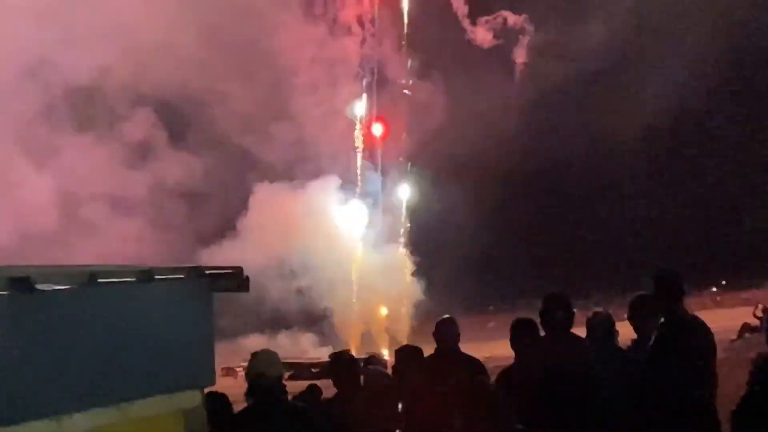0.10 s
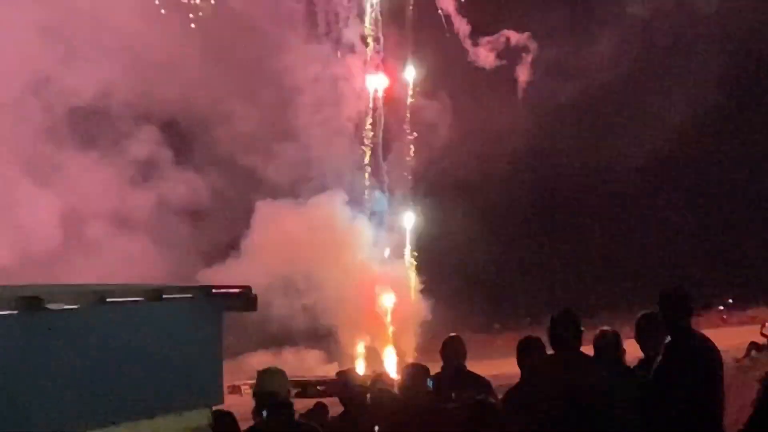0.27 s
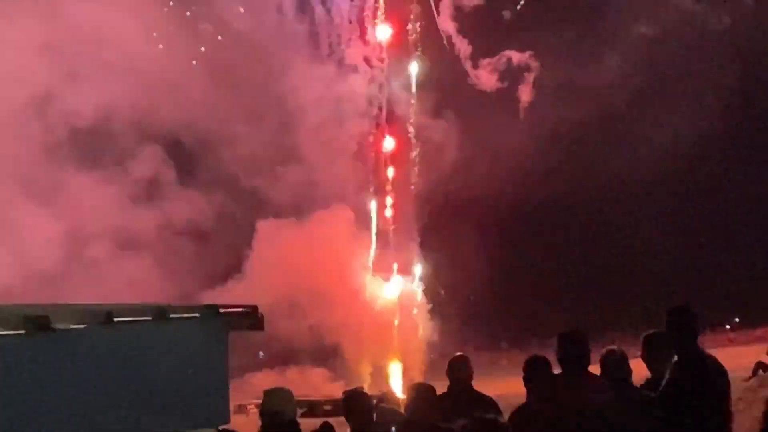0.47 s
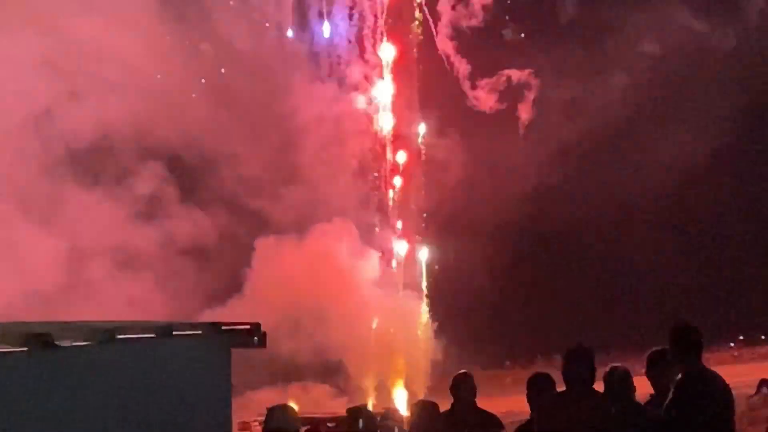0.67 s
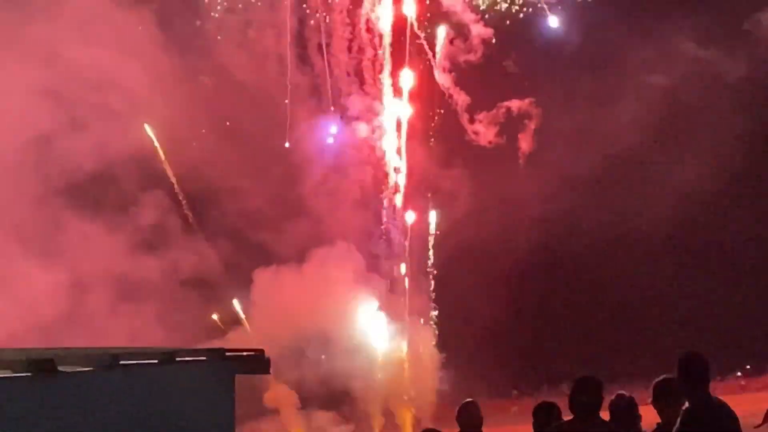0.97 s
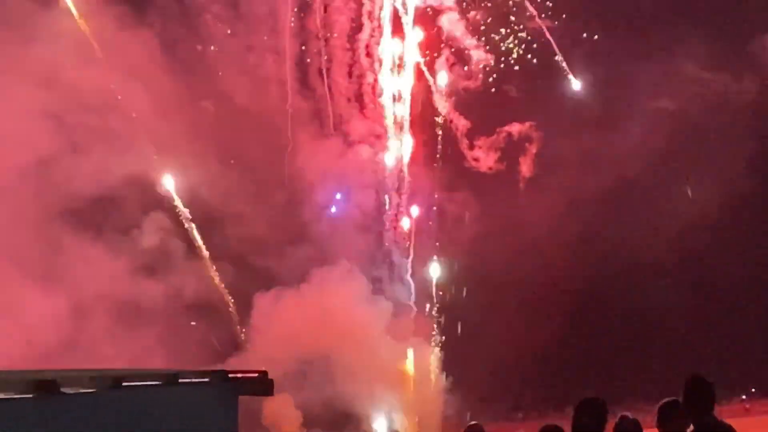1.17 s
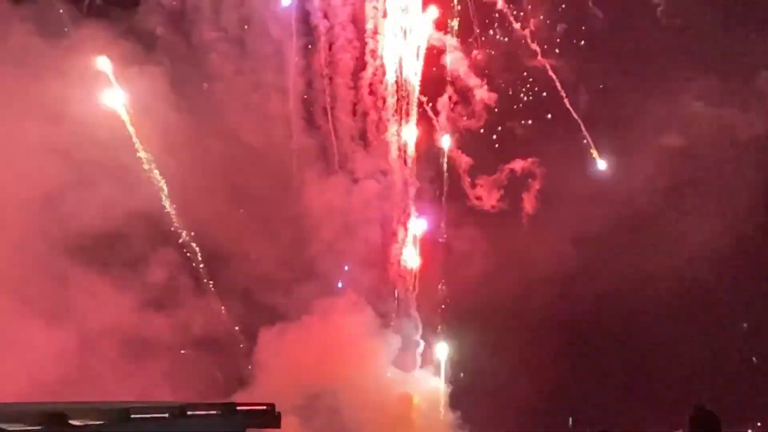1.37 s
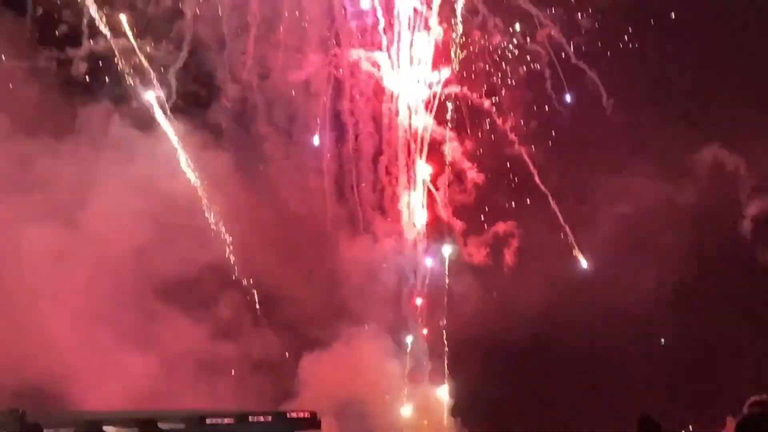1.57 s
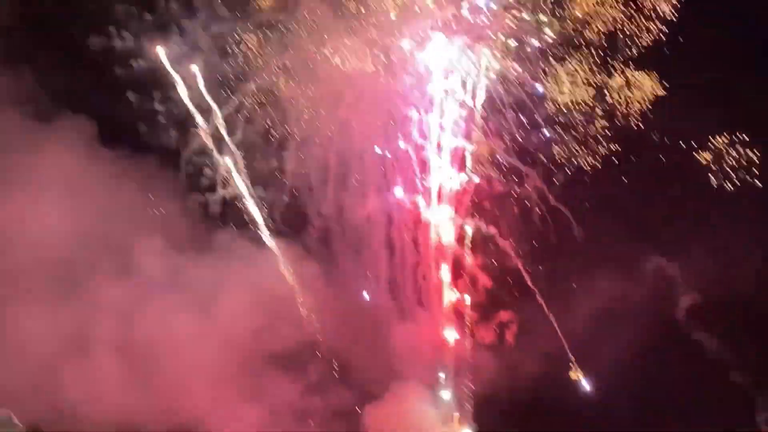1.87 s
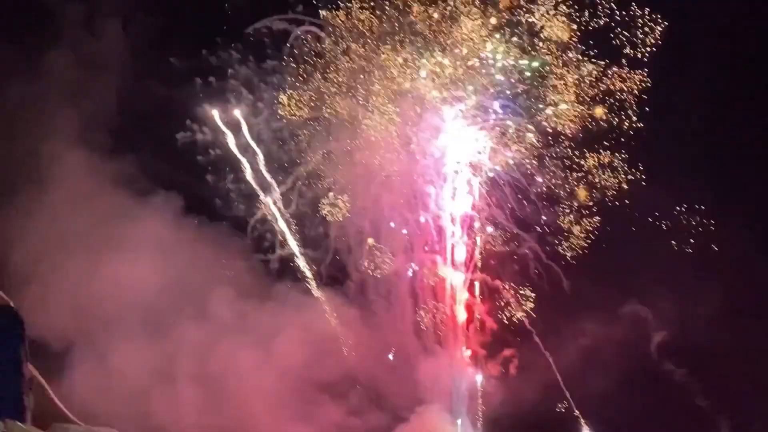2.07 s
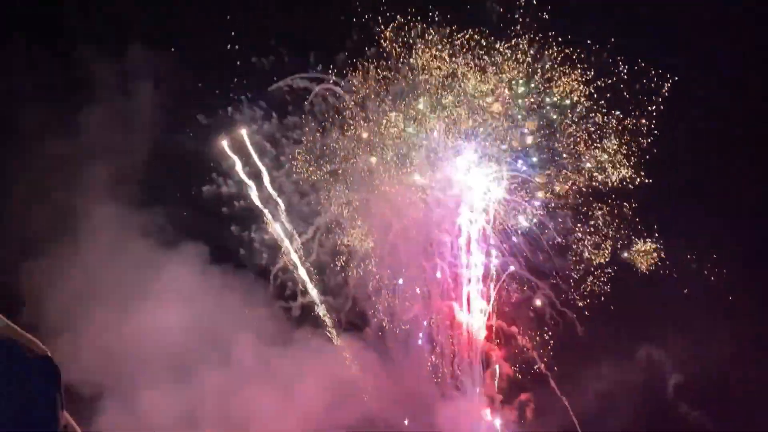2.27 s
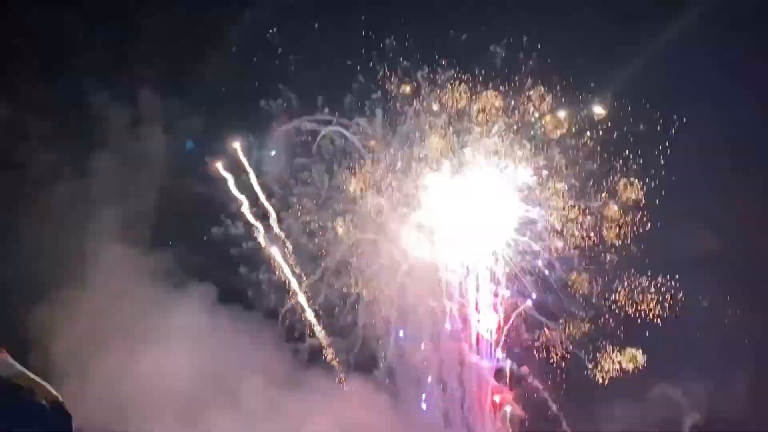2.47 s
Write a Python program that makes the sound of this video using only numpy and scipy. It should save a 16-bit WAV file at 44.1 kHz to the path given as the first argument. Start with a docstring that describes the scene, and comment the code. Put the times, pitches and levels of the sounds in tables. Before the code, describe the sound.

Fireworks barrage outdoors. Crackling, sizzling stars and a low roll run from the start, with a dull thud near 0.1 s. From 0.23 s about nineteen loud, punchy bangs come unevenly, clustered around 0.7-0.85, 1.2, 1.7 and 1.9-2.2 s, the last at 2.33 s, with short field echoes. Deep distant booms swell near 1.0-1.3 s. Pops crackle on alone until about 2.6 s.

```python
"""A fireworks barrage at night in the open, heard by a phone some way from the mortars.
From the start, stars crackle densely overhead (short pops and hiss) above a low roll (filtered noise).
A little later the lift charges bang in quick, uneven order: pressure steps with ground mirrors and echoes.
Big shells boom high up, mostly midway, as low pulses; dull thuds come from afar. The crackle outlasts the bangs.
The phone's filters let the lows arrive late, so every bang becomes a short falling chirp."""
import sys
import numpy as np
from scipy import signal
from scipy.fft import rfft, irfft, next_fast_len
from scipy.io import wavfile

SR = 44100
rng = np.random.default_rng(int(sys.argv[2]) if len(sys.argv) > 2 else 0)


def to_wav(sig):
    """Store sig (one row per channel, or 1-D mono) as 16-bit WAV at the path in sys.argv[1].

    Samples outside -1..1 are clipped; the rate is SR.
    """
    pcm = np.clip(np.atleast_2d(sig), -1, 1) * 32767
    pcm = np.round(pcm).astype(np.int16)
    wavfile.write(sys.argv[1], SR, pcm.T)  # frames by channels


N = 114660
M = next_fast_len(N + SR)  # working length in samples, with a spare second for echoes
HZ = np.arange(M // 2 + 1) * SR / M
S = 2j * np.pi * HZ  # multiplying by exp(-S * lag) delays a sound by lag seconds
APART_DB = -8  # level of the left-right difference in stereo noise


def undb(db):
    """Turn decibels into a gain."""
    return 10 ** (np.asarray(db, float) / 20)


def low(hz):
    """One-pole low-pass response: lets the lows through."""
    return 1 / (1 + 1j * HZ / hz)


def second(hz, q):
    """High-pass, band-pass and all-pass responses of one resonator."""
    u = 1j * HZ / hz
    d = u * u + u / q + 1
    high_pass = u * u / d
    band_pass = u / q / d
    all_pass = (u * u - u / q + 1) / d
    return high_pass, band_pass, all_pass


def band(lo_hz, hi_hz):
    """Band-pass response that keeps white noise of rms 1 at rms 1."""
    shape = second(lo_hz, 1.0)[0] * low(hi_hz) ** 2
    return shape / np.sqrt(np.mean(np.abs(shape) ** 2))


def peak(shape):
    """Scale a response so that its impulse peaks at 1."""
    return shape / np.abs(irfft(shape, M)).max()


def train(times, gains):
    """Spectrum of clicks, each shared between two neighbouring samples."""
    x = np.zeros(M)
    at = np.clip(np.asarray(times) * SR, 0, M - 2)
    i = at.astype(int)
    np.add.at(x, i, gains * (1 + i - at))
    np.add.at(x, i + 1, gains * (at - i))
    return rfft(x)


def stereo(size):
    """Noise that is mostly alike left and right."""
    mid, side = rng.standard_normal((2, size))
    return mid + undb(APART_DB) * side * np.array([[1], [-1]])


def bursts(times, db, t60, lo_hz, hi_hz):
    """Band-passed noise that dies away after each time; where bursts overlap, their powers add."""
    t = np.arange(SR // 2) / SR
    power_fall = np.exp(-2 * np.log(1000) * t / t60)
    power = irfft(train(times, undb(2 * db)) * rfft(power_fall, M), M)
    return rfft(stereo(M) * np.sqrt(np.maximum(power, 0))) * band(lo_hz, hi_hz)


BLAST_FALL_S, BLAST_EDGE_HZ, BANG_LOW_HZ = 0.0059, 18000, 205.2  # pressure fall, sharp front, bass loss
BODY_HZ, BODY_DB, FRONT_DB = 556, 2.5, -6.5  # corner of the blast's body, gains well below and well above it
GROUND_HZ = 504  # soft ground dulls the mirrors
SECOND_LAG_S, SECOND_DB = 0.006114, -11  # second, later mirror
THUMP_DB, THUMP_HZ, THUMP_LAG_S = -30, 60, 0.00067  # deep push of each mortar
# Lift charges, levels before the blast is shaped.
# Columns: t/s, level/dB, lag of the ground mirror [ms], level of the mirror against the bang/dB
LIFT_CHARGES = [(0.2284, 7.6, 3.4, -3), (0.4101, 7.5, 3.51, -3), (0.6, 8.5, 3.68, -1.3),
                (0.717, 7.3, 3.45, -0.5), (0.735, 7.5, 3.5, -5.5), (0.7858, 7.5, 3.06, -5.5),
                (0.849, 8, 3.2, -3), (1.0765, 7.5, 3.68, 2.1), (1.2, 7.5, 3.4, -5), (1.2603, 8.0, 3.4, -4),
                (1.5914, 7.5, 3.24, -4), (1.6813, 7.5, 3.3, -2), (1.7239, 7, 3.87, -1.2),
                (1.9006, 8.5, 3.86, -6), (1.9095, 7.5, 3.5, -8), (2.065, 7, 3.6, -4), (2.1725, 7, 3.2, -9),
                (2.1877, 7, 3.4, -6), (2.3286, 7.5, 3.3, -5)]


def bangs():
    """Each lift charge is a pressure step that falls away, with ground mirrors, a thump and echoes."""
    t, db, lag_ms, ground_db = np.array(LIFT_CHARGES).T
    direct = sum(undb(d) * np.exp(-S * a) for a, d in zip(t, db))

    first_mirror = train(t + lag_ms / 1000, undb(db + ground_db))
    second_mirror = undb(SECOND_DB) * direct * np.exp(-S * SECOND_LAG_S)
    mirrors = (first_mirror + second_mirror) * low(GROUND_HZ) ** 2

    blast = SR / (S + 1 / BLAST_FALL_S) * low(BLAST_EDGE_HZ)
    blast = blast * second(BANG_LOW_HZ, np.sqrt(.5))[0] ** 2
    body_gain = undb(FRONT_DB) + (undb(BODY_DB) - undb(FRONT_DB)) * low(BODY_HZ)
    near = (direct + mirrors) * blast * body_gain

    thump_shape = peak(second(THUMP_HZ, 1.36)[1] * low(THUMP_HZ) ** 2)
    thump = undb(THUMP_DB) * direct * np.exp(-S * THUMP_LAG_S) * thump_shape
    return near * (1 + field_roll()) + thump + (rasp(t, db) + scatter(t, db) + wall_echo(t, db))


def rasp(t, db):
    """Rough edge of each bang: a very short burst of bright noise."""
    return bursts(t, db - 25.5, 0.011, 980, 8100)


def scatter(t, db):
    """Near things scatter each bang into a short wash of noise, 3.5 ms late."""
    return bursts(t + 0.0035, db - 28, 0.07, 240, 1260)


def wall_echo(t, db):
    """A far wall sends each bang back 92 ms late, as a blurred, dull echo."""
    wall_hz = 430
    return bursts(t + .092, db - 28, 0.1, 152, wall_hz) * low(wall_hz) ** 2


FIELD_DB, FIELD_T60_S, FIELD_LAG_S, FIELD_HZ = -16.5, 0.65, .02, 447


def field_roll():
    """Long roll over the field: the response of a dulled, dying noise echo."""
    t = np.arange(SR) / SR
    fall = np.exp(-np.log(1000) * t / FIELD_T60_S)
    noise = stereo(SR) * fall / np.sqrt(np.sum(fall ** 2))
    return undb(FIELD_DB) * rfft(noise, M) * np.exp(-S * FIELD_LAG_S) * low(FIELD_HZ) ** 2


# Distant shell bursts. Columns: t/s, level/dB
SHELL_BOOMS = [(0.002, -24), (0.975, -7.5), (1.11, -16.5), (1.288, -10), (1.39, -23.5), (2.455, -28)]


def booms():
    """Big shells so far off that only a rounded, deep pulse is left."""
    return far_pulses(SHELL_BOOMS, 62.7, 1.6)


# Dull far thuds. Columns: t/s, level/dB
FAR_THUDS = [(0.072, -19), (0.134, -27), (0.458, -30), (0.567, -29), (1.643, -28), (2.417, -29),
             (2.546, -44)]


def thuds():
    """Far thuds: the same kind of rounded pulse as a boom, but higher in pitch."""
    return far_pulses(FAR_THUDS, 290, 1.15)


def far_pulses(table, hz, q):
    """Clicks rung through a broad resonance and dulled, as distance dulls a burst."""
    t, db = np.array(table).T
    return train(t, undb(db)) * peak(second(hz, q)[1] * low(1.7 * hz) ** 3)


CRACK_LOW_HZ, CRACK_HIGH_HZ, CRACK_TOP_HZ = 525, 3240, 7700  # lower corner, two upper corners
CRACK_TAIL_DB, CRACK_T60_S = -15.5, 0.011  # blur after each pop


def crackle():
    """Stars crackle as tiny sharp clicks, bass and top taken off, each with a short blur of noise."""
    t, db, pan_db = np.concatenate([single_stars(), star_cloud()], axis=1)
    clicks = np.array([train(t, undb(db + pan_db / 2)), train(t, undb(db - pan_db / 2))])
    shape = peak(second(CRACK_LOW_HZ, 0.74)[0] * low(CRACK_HIGH_HZ) * low(CRACK_TOP_HZ) ** 2)
    blur = bursts(t, db + CRACK_TAIL_DB, CRACK_T60_S, CRACK_LOW_HZ, 2 * CRACK_HIGH_HZ)
    return clicks * shape + blur * low(CRACK_TOP_HZ) + sizzle()


CRACK_DB, CRACK_RISE_S = 3, 0.00101  # lift of the single stars; peak of a single star after its start
# Single crackling stars, loud and faint, levels before the lift. Columns: start t/s, level/dB
SINGLE_STARS = [(0.1481, -19.5), (0.2892, -40), (0.2954, -44), (0.3097, -26), (0.3681, -27), (0.4459, -27),
                (0.4524, -21.5), (0.4773, -15.5), (0.5018, -21), (0.5054, -20), (0.5501, -22),
                (0.6335, -24), (0.6649, -25), (0.8854, -27.5), (0.9098, -28), (0.9144, -26),
                (0.9867, -21.5), (1.0231, -21.5), (1.046, -30), (1.1344, -33), (1.1393, -32), (1.2346, -21),
                (1.3139, -24), (1.3468, -28), (1.3997, -19.5), (1.4511, -21), (1.493, -45), (1.512, -30),
                (1.5339, -21), (1.6292, -27), (1.7843, -24.5), (1.8292, -27), (1.8662, -27), (1.9495, -31),
                (1.9774, -43), (1.9914, -40), (2.0043, -19), (2.0986, -34), (2.1171, -22), (2.2697, -31),
                (2.3625, -20), (2.4039, -25.5), (2.4394, -24), (2.4683, -18.5), (2.5087, -20),
                (2.5134, -29), (2.5416, -22.5), (2.5501, -22.5), (2.5731, -25), (2.5864, -22),
                (2.5954, -17.5)]


def single_stars():
    """Times, levels and left-right tilts of the singly placed pops, which sit in the middle."""
    t, db = np.array(SINGLE_STARS).T
    return np.array([t + CRACK_RISE_S, db + CRACK_DB, 0 * t])


CLOUD_PER_S, CLOUD_SPREAD_DB, CLOUD_PAN_DB = 330, 3, 2  # pops per second, level spread, most left-right tilt
POP_DB = 12  # about where the faintest pops lie above the cloud level
# Cloud of crackling stars: a base level, joined by straight lines. Columns: t/s, level/dB
STAR_CLOUD = [(0, -35.5), (.17, -38.5), (.2, -44.5), (.3, -43.5), (.35, -48.5), (.44, -44), (.55, -38.5),
              (.66, -40), (.8, -43.5), (.95, -40), (1.05, -42.5), (1.15, -40.5), (1.3, -41), (1.43, -48),
              (1.55, -43), (1.65, -36.5), (1.8, -37.5), (1.95, -46.5), (2.05, -36), (2.12, -42.5),
              (2.23, -35.5), (2.3, -43), (2.42, -45.5), (2.52, -45), (2.6, -46)]


def cloud_level(t):
    """Base level of the star cloud in dB at the given times."""
    return np.interp(t, *np.array(STAR_CLOUD).T)


def star_cloud():
    """Times, levels and tilts of many pops, drawn at random, from about 12 dB above the cloud level upward."""
    count = int(CLOUD_PER_S * N / SR)
    when, size, side = rng.random((count, 3)).T
    when = when * N / SR
    # the logarithm makes most pops small and a few big
    db = cloud_level(when) - CLOUD_SPREAD_DB * np.log(size + 1e-3) + POP_DB
    return np.array([when, db, CLOUD_PAN_DB * (2 * side - 1)])


def sizzle():
    """Far stars, too dense to tell apart: noise that follows the cloud level, 3 dB below it."""
    swell = undb(cloud_level(np.arange(M) / SR) - 3)
    return rfft(stereo(M) * swell) * band(CRACK_LOW_HZ, 2400)


def rumble():
    """Roll of earlier bursts: two bands of low noise that never stop and swell unevenly."""
    out = 0
    for db, hz, q in (-39, 285, 0.9), (-45.5, 59, 1.5):
        knots = np.arange(0, M, 1500)  # a new random level every 1500 samples
        swell = np.interp(np.arange(M), knots, rng.standard_normal(len(knots)))
        ring = second(hz, q)[1] ** 2
        ring = ring / np.sqrt(np.mean(np.abs(ring) ** 2))
        out = out + undb(db) * rfft(stereo(M) * undb(2.4 * swell)) * ring
    return out


def scene():
    """All sources added up at the phone."""
    sources = bangs() + booms() + thuds() + crackle() + rumble()
    return irfft(sources, M)[:, :N]


DEEP_SMEAR_HZ, HIGH_SMEAR_HZ, MID_SMEAR_HZ = (58, 71), (415, 336), (339, 325)  # all-pass filters (left, right)
SMEAR_Q, FLIP_HZ, MIC_LOW_HZ = 0.37, 4900, 44.3  # their sharpness; one more, gentler all-pass; bass loss
RIGHT_DB, RIGHT_LEAD_S, RIGHT_FROM_HZ = 0.76, 0.00022, 6665  # the right treble comes early
PORT_DB, PORT_HZ, PORT_Q, PORT_LAG_S = -3, 1458, 12, 0.00021  # resonance at the right port
LIMIT, TOP_HZ = 5.4, 16700  # soft ceiling (1 = full scale); end of the treble


def record(dry):
    """All-pass filters delay the lows, the right port colours, a soft ceiling holds peaks, the top is cut."""
    flip_rate = 2 * np.pi * FLIP_HZ
    smear = (S - flip_rate) / (S + flip_rate) * second(MIC_LOW_HZ, 0.63)[0] ** 2
    for hz in DEEP_SMEAR_HZ, HIGH_SMEAR_HZ, MID_SMEAR_HZ:
        smear = smear * second(np.array(hz)[:, None], SMEAR_Q)[2]

    lead = np.exp(2j * np.pi * RIGHT_LEAD_S * np.maximum(HZ - RIGHT_FROM_HZ, 0))
    port = undb(PORT_DB) * second(PORT_HZ, PORT_Q)[1] * np.exp(-S * PORT_LAG_S)
    right = undb(RIGHT_DB) * lead * (1 + port)
    sides = np.array([np.ones(len(HZ)), right])

    wet = irfft(rfft(dry, M) * smear * sides, M)[:, :N]
    held = LIMIT * np.tanh(wet / LIMIT)
    cut = signal.ellip(10, .2, 80, TOP_HZ, fs=SR, output="sos")
    return signal.sosfilt(cut, held)


dry = scene()
out = record(dry)
to_wav(out)
```